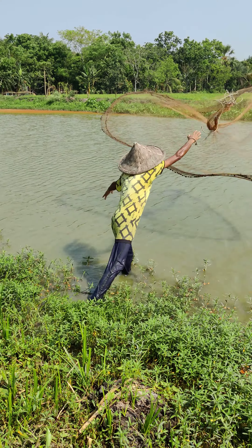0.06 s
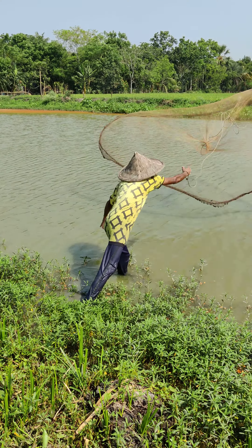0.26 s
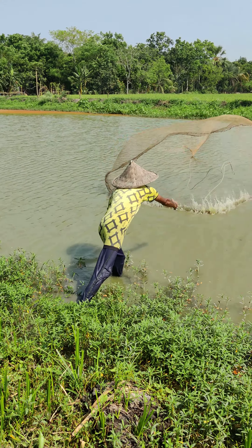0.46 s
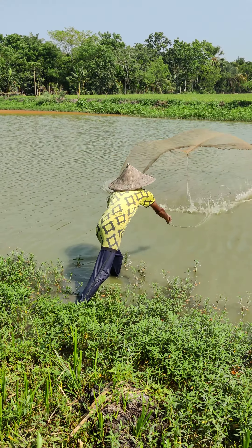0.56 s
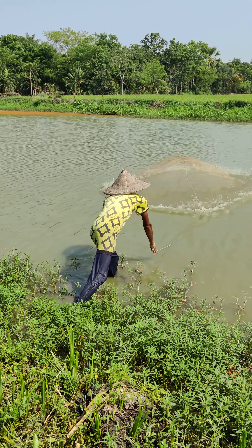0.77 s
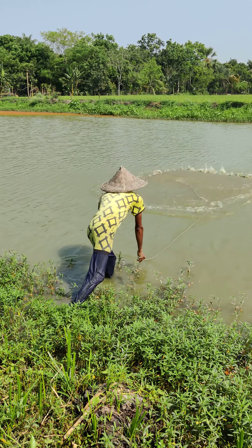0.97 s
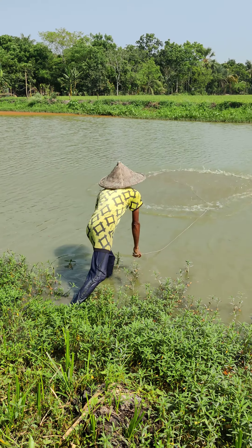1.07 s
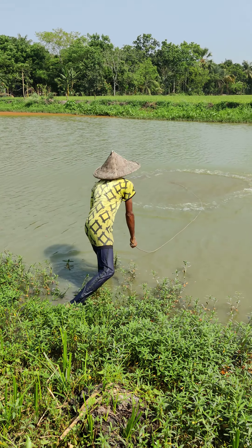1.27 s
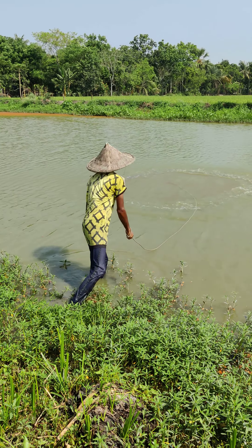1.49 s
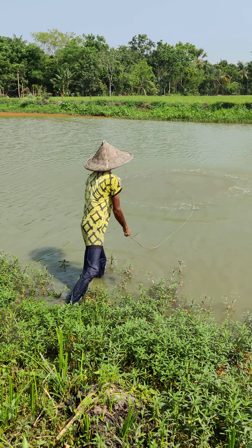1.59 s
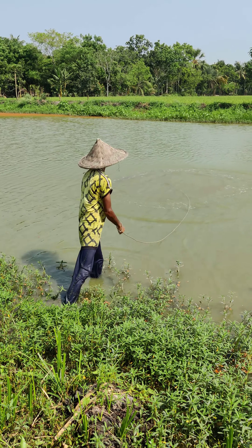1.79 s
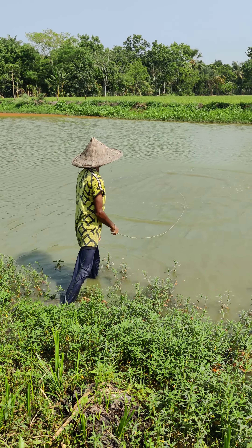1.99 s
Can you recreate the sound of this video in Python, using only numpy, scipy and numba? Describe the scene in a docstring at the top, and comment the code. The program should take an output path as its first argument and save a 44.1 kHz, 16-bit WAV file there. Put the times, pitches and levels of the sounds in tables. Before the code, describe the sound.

A thrown cast net splashes onto a pond: faint high rustle and wet ticks until 0.4 s, then sharp clicks and a bright hissing spray, surging again near 0.77 s with low bubble plops. A tiny bubble whistles upward around 1.1 s, and the splash thins away by 1.7 s. Faint outdoor hiss continues; low wind thumps buffet the phone microphone, much harder on the left, especially after 0.75 s.

```python
"""A faint country hiss and wind at two microphone ports of a phone: noise shaped in spectrum and level.
A wet cast net ticks in flight and on through the splash: clusters of short rings over a fading rustle.
At 0.4 s its weighted rim slaps down on a pond in two sweeps: showers of dying sines make spray and mist.
Trapped bubbles ring lower, and near 1.1 s one whistles upward; the splash thins out by 1.7 s.
Gusts and single eddies buffet the ports throughout, the left far harder."""
import sys
import numpy as np
from scipy import signal
from scipy.fft import rfft, irfft
from scipy.io import wavfile
from scipy.ndimage import uniform_filter1d, map_coordinates
from numba import njit

SR = 44100
rng = np.random.default_rng(int(sys.argv[2]) if len(sys.argv) > 2 else 0)


def unload_wav(signal):
    """Save mono or channel-first audio to the path in sys.argv[1] as 16-bit WAV at rate SR, clipped to [-1, 1]."""
    wavfile.write(
        sys.argv[1],
        SR,
        np.round(np.clip(np.atleast_2d(signal).T, -1, 1) * 32767).astype(np.int16),
    )


def convert_level_to_amplitude(level_db):
    """Map a level in decibels to its linear amplitude factor."""
    exponent = np.asarray(level_db, float) / 20
    return 10 ** exponent


N = 90404
T = np.arange(N) / SR


def curve(table, col):
    """Column of a table joined linearly in time."""
    a = np.array(table, float)
    return np.interp(T, a[:, 0], a[:, col])


def colour(x, points):
    """Causal minimum-phase filter through (freq_hz, gain_db) points."""
    a, size = np.array(points, float), 8192
    log_hz = np.log(np.fft.rfftfreq(size, 1 / SR) + 1)
    gain_db = np.interp(log_hz, np.log(a[:, 0]), a[:, 1])
    # fold the cepstrum to its causal half
    cepstrum = irfft(np.log(convert_level_to_amplitude(gain_db)))
    cepstrum[1:size // 2] *= 2
    cepstrum[size // 2 + 1:] = 0
    impulse = irfft(np.exp(rfft(cepstrum)))[:size // 2]
    return signal.fftconvolve(x, impulse)[:N]


def unit(x):
    """Scaled to rms 1."""
    return x / np.sqrt(np.mean(x ** 2))


def walk(rate_hz):
    """Random levels of rms 1, held 1 / rate_hz and slewed twice."""
    hold = int(SR / rate_hz)
    steps = np.repeat(rng.standard_normal(N // hold + 1), hold)
    slewed = uniform_filter1d(uniform_filter1d(steps, hold), hold)
    return unit(slewed[:N])


def samples(start_s):
    """Times as sample indices."""
    return (start_s * SR).astype(np.int64)


@njit
def ring(start, hz, cycles, size, rise, n):
    """Each grain is a dying sine whose pitch climbs by rise (a fraction) per life of so many cycles."""
    out = np.zeros(n)
    for k in range(len(start)):
        life = cycles[k] * SR / hz[k]
        phase = 0.
        for j in range(min(int(4 * life), n - start[k])):
            phase += min(hz[k] * (1 + rise * j / life), .47 * SR) / SR
            envelope = min(6 * j / life, 1.) * np.exp(-j / life * 1.5)
            out[start[k] + j] += size[k] * envelope * np.sin(2 * np.pi * phase)
    return out


def grains(per_s, lo_hz, hi_hz, cycles, spread_db, rise):
    """A random shower of rings, white on average, of very unequal size."""
    u = rng.random((int(per_s * N / SR), 4)).T
    start = (u[0] * (N - 1)).astype(np.int64)
    hz = np.minimum(lo_hz + (hi_hz - lo_hz) * u[1], .45 * SR)
    size = convert_level_to_amplitude(-spread_db * np.log(1 - u[2])) * np.sqrt(hz)
    return ring(start, hz, cycles * (.5 + u[3]), size, 1. * rise, N)


def spread(make, apart):
    """Mixes a sound common to both ports with ones of their own; apart is the power share of the latter."""
    apart = np.clip(apart, 0, 1)
    return np.sqrt(1 - apart) * make() + np.sqrt(apart) * np.array([make(), make()])


# country hiss: freq_hz, gain_db
AIR_COLOUR = [(100, 12.5), (250, 7), (500, 4.5), (1000, 1), (2500, 1.5), (5000, -2.5), (9000, -3.5),
              (13000, -2), (14200, -13), (16000, -29)]


def air():
    """Steady coloured noise, partly shared by the ports."""
    return spread(lambda: unit(colour(rng.standard_normal(N), AIR_COLOUR)), apart=0.47) * convert_level_to_amplitude(-56.5)


def eddies(table):
    """Each eddy is a push or suck with rebounds, leaning a little early or late."""
    out = np.zeros(N)
    u = rng.random((len(table), 2))
    leans_rad = np.pi * np.round(u[:, 0]) + 0.93 * (u[:, 1] - .5)
    for (start_s, level_db, hz), lean in zip(table, leans_rad):
        x = np.pi * hz * (T - start_s)
        shape = np.cos(lean) * (1 - 2 * x ** 2) + 2 * np.sin(lean) * x
        out += convert_level_to_amplitude(level_db) * shape * np.exp(-np.abs(x) ** 1.587)
    return out


def turbulence(points, depth_db):
    """Coloured noise of rms 1 whose level wanders."""
    return unit(colour(rng.standard_normal(N), points) * convert_level_to_amplitude(depth_db * walk(25.99)))


# slow and quick turbulence: freq_hz, gain_db
RUMBLE_COLOUR = [(12, -13), (25, 10), (45, 1), (75, -7.5), (110, -10.5), (160, -25.5), (250, -62)]
FLUTTER_COLOUR = [(70, -10.5), (130, 5.5), (200, -5), (300, -19.5), (480, -29.5), (700, -58.5)]
# gusts at the left port: time_s, rumble_db, flutter_db
GUST_LEFT = [(0.0, -27, -32.5), (0.1, -33, -82), (0.14, -59, -76), (0.37, -26, -67), (0.44, -30, -33.5),
             (0.48, -28, -73), (0.52, -32, -54), (0.66, -43, -76), (0.78, -15, -33.5), (0.86, -35, -51),
             (0.92, -23, -46.5), (1.08, -31, -30.5), (1.28, -30.5, -55), (1.31, -21.5, -34.5),
             (1.39, -39, -61), (1.45, -28, -40.5), (1.53, -26, -26.5), (1.65, -33, -32), (1.68, -24.5, -65),
             (1.8, -31, -25), (1.96, -28.5, -58), (2.05, -31.5, -69)]
# gusts at the right port: time_s, rumble_db
GUST_RIGHT = [(0.0, -35.5), (0.15, -44.9), (0.29, -39.4), (0.44, -41.7), (0.59, -43.8), (0.73, -38.9),
              (0.88, -49.2), (1.02, -51.2), (1.17, -43.3), (1.32, -47.7), (1.46, -45.0), (1.61, -38.6),
              (1.76, -41.8), (1.9, -50.0), (2.05, -55.3)]
# single eddies hitting each port: centre_s, level_db, pitch_hz
EDDIES_LEFT = [(0.02, -28, 60.6), (0.432, -7.5, 50), (0.535, -25, 88), (0.768, -18.5, 117),
               (0.787, -9.5, 70.4), (0.949, -12, 44), (1.006, -21, 95), (1.047, -21.5, 182),
               (1.048, -13.5, 71.6), (1.067, -17, 177), (1.074, -15, 118), (1.085, -21.5, 183),
               (1.161, -17.5, 103), (1.215, -19.5, 79), (1.241, -15.5, 62), (1.299, -19.5, 51.6),
               (1.457, -10.5, 69.5), (1.48, -13.5, 42.3), (1.509, -14, 80.4), (1.548, -14, 186),
               (1.55, -8, 124), (1.575, -15.5, 62.4), (1.596, -14.5, 46.7), (1.614, -15, 105),
               (1.62, -16, 163), (1.632, -10.5, 65.8), (1.637, -17, 165), (1.66, -15, 73.5),
               (1.706, -15.5, 86.5), (1.76, -17.5, 40), (1.774, -12, 54.7), (1.792, -8.5, 66.4),
               (1.793, -36, 194), (1.819, -27, 214), (1.834, -11, 37), (1.9, -18.5, 83.5)]
EDDIES_RIGHT = [(0.058, -26.3, 43), (0.124, -31.8, 36), (0.223, -25.8, 41), (0.591, -28.1, 41),
                (0.674, -28.7, 34), (1.565, -25.5, 45), (1.712, -27.0, 38)]


def wind():
    """Turbulence and eddies press on each port, unrelated between them."""
    rumble_left = turbulence(RUMBLE_COLOUR, 0.84) * convert_level_to_amplitude(curve(GUST_LEFT, 1))
    flutter_left = turbulence(FLUTTER_COLOUR, 5.2) * convert_level_to_amplitude(curve(GUST_LEFT, 2))
    rumble_right = turbulence(RUMBLE_COLOUR, 0.71) * convert_level_to_amplitude(curve(GUST_RIGHT, 1))
    left = rumble_left + flutter_left + eddies(EDDIES_LEFT)
    right = rumble_right + eddies(EDDIES_RIGHT)
    return np.array([left, right])


def rustle():
    """The flying net: a shower of tiny high rings, fading steadily."""
    level_db, fade_db_per_s = -52, 37
    shower = grains(per_s=3000, lo_hz=5050, hi_hz=12900, cycles=2.1, spread_db=3.57, rise=0.)
    return unit(shower) * convert_level_to_amplitude(level_db - fade_db_per_s * T)


# ticks of the wet net and its weights, and one late water drip (1.412 s): start_s, level_db, pitch_hz
TICKS = [(0.0125, -32.5, 5600), (0.0527, -39, 5600), (0.062, -44, 5400), (0.1427, -46, 5100),
         (0.1526, -35.5, 6200), (0.195, -48, 4300), (0.246, -39, 5490), (0.2717, -33, 5500),
         (0.2728, -30, 11400), (0.291, -39, 5540), (0.3357, -37, 5400), (0.3576, -36, 5940),
         (0.407, -24.5, 3470), (0.4361, -16, 5100), (0.4747, -16.5, 5370), (0.4776, -29, 1840),
         (0.5012, -20, 2250), (0.5078, -28, 2110), (0.6847, -27, 3650), (0.743, -29, 4330),
         (0.752, -27, 3010), (0.7621, -16, 4400), (1.044, -36, 4770), (1.1192, -24, 4500),
         (1.1973, -45, 3900), (1.412, -39, 4500), (1.731, -37.5, 4760)]


def ticks():
    """Each tick is a cluster of three short rings at nearby pitches."""
    start_s, level_db, pitch_hz = np.repeat(np.array(TICKS), 3, axis=0).T
    u = rng.random((len(start_s), 2)).T
    start = samples(start_s + 0.00081 * u[0])
    ratio = np.tile([.8, 1, 1.22], len(TICKS)) + 0.083 * u[1]
    cycles = np.full(len(start), 3.5)
    return ring(start, pitch_hz * ratio, cycles, convert_level_to_amplitude(level_db) / 2, 0., N)


# single big bubbles: start_s, level_db, pitch_hz, life_cycles
PLOPS = [(.502, -49, 690, 9.3), (.522, -41.5, 213.3, 11), (.522, -34.5, 744, 4.8), (.538, -32.5, 613, 9.1),
         (.556, -32.5, 820, 14), (.607, -31.5, 670, 5.4), (.675, -36.5, 716, 8.8), (0.681, -43, 298, 6.1),
         (.755, -40, 700, 7.5), (.785, -26, 840, 4.3), (0.802, -43.5, 338, 13.4), (.806, -41, 564, 11),
         (0.823, -37.5, 814, 9.7), (.87, -44.5, 343, 4.9), (.878, -39.5, 600, 9.6),
         (1.207, -43.5, 1300, 18), (1.262, -44.5, 757, 11.3), (1.315, -48, 620, 8), (1.383, -50, 987, 11),
         (1.448, -46, 836, 13), (1.449, -44, 484, 7.4)]


def plops():
    """Big bubbles ring singly, their pitch climbing slightly."""
    start_s, level_db, pitch_hz, cycles = np.array(PLOPS).T
    return ring(samples(start_s), pitch_hz, cycles, convert_level_to_amplitude(level_db), 0.059, N)


# rising bubble: start_s, level_db, start_pitch_hz, life_cycles, climb_per_life
WHISTLE = [(1.121, -42, 1000, 32, 0.98)]


def whistle():
    """A bubble whistles upward as it nears the surface."""
    start_s, level_db, pitch_hz, cycles, climb = np.array(WHISTLE).T
    return ring(samples(start_s), pitch_hz, cycles, convert_level_to_amplitude(level_db), climb[0], N)


# small bubbles: freq_hz, gain_db
BUBBLE_COLOUR = [(200, -12.5), (350, -10.5), (500, -7.5), (700, 0.5), (900, -2), (1300, -2), (2000, -9)]


def bubbles():
    """A shower of low rings from small trapped bubbles, rms 1."""
    def shower():
        rings = grains(per_s=2400, lo_hz=176, hi_hz=2508, cycles=5.36, spread_db=2.42, rise=.12)
        return unit(colour(rings, BUBBLE_COLOUR))
    return spread(shower, apart=0.15)


# extra treble of the spray: freq_hz, gain_db
MIST_COLOUR = [(2500, -8.5), (4000, 7), (6000, 4.5), (9000, 5), (12000, 1), (15500, 5.5)]
# its level: time_s, level_db
MIST = [(0.41, -39), (0.432, -34), (0.742, -42.5), (0.76, -32), (0.81, -40), (0.85, -53), (1.022, -49),
        (1.05, -43), (1.064, -50.5), (1.5, -65)]


def mist():
    """Fine drops: a bright shower that fades on after its last level."""
    def shower():
        rings = grains(per_s=7000, lo_hz=2470, hi_hz=14600, cycles=2.9, spread_db=2.66, rise=0.12)
        return unit(colour(rings, MIST_COLOUR))
    drops = spread(shower, apart=0.51)
    fade_db = 40 * np.maximum(T - MIST[-1][0], 0)  # 40 dB per s
    return drops * convert_level_to_amplitude(curve(MIST, 1) - fade_db + walk(61.6))


# spray: freq_hz, gain_db
SPRAY_COLOUR = [(900, -7), (1500, 0.5), (2500, 2.5), (4000, 1), (6000, -7), (9000, -16.5), (15000, -11)]


def spray():
    """A dense broadband shower of drops, rms 1."""
    def shower():
        rings = grains(per_s=15000, lo_hz=757, hi_hz=15860, cycles=2.17, spread_db=2.03, rise=0.086)
        return unit(colour(rings, SPRAY_COLOUR))
    return spread(shower, apart=0.2)


# the rim sweeping into the water: time_s, spray_db, bubbles_db
SPLASH = [(0.41, -44, -53), (0.43, -38, -58), (0.456, -40.5, -60), (0.494, -38.5, -47), (0.503, -38, -41),
          (0.56, -36, -38.5), (0.648, -38, -46.5), (0.682, -40.5, -41.5), (0.732, -43.5, -45.5),
          (0.774, -32.5, -43.5), (0.784, -33.5, -38.5), (0.972, -45.5, -48.5), (1.05, -45, -48.5),
          (1.295, -51.5, -59.5), (1.32, -59, -61), (1.41, -57.5, -70), (1.46, -62.5, -59.5),
          (1.518, -69, -64), (1.62, -68, -84)]


def splash():
    """Spray, mist and bubbles follow the rim as it sweeps into the water."""
    contact_s, rise_s, fall_s = .404, .005, 0.046
    opening = np.clip((T - contact_s) / rise_s, 0, 1)
    closing = np.clip((SPLASH[-1][0] - T) / fall_s + 1, 0, 1)
    spray_part = spray() * convert_level_to_amplitude(curve(SPLASH, 1) + walk(45.78))
    bubble_part = bubbles() * convert_level_to_amplitude(curve(SPLASH, 2))
    return opening * closing * (spray_part + mist() + bubble_part) + plops() + whistle()


# cavity resonance of each port: freq_hz, gain_db
PORT_LEFT = [(300, 4), (1000, 2), (2500, -3.5), (4200, -5), (5400, -0.5), (6500, 6.5), (7400, -9.5),
             (9000, -10), (15000, -11.5)]
PORT_RIGHT = [(300, 3), (1000, 0.5), (2500, -1), (3700, 2), (5000, 6), (5800, 5), (7200, -12.5),
              (10000, -14), (15000, -6)]


def ports(heard):
    """Port cavities colour airborne sound; the right port is farther from the splash, so it lags."""
    right_lag_s = 3e-5
    late = map_coordinates(heard[1], [(T - right_lag_s) * SR], order=5, mode="mirror")
    return np.array([colour(heard[0], PORT_LEFT), colour(late, PORT_RIGHT)])


def scene():
    """Airborne sound passes the port cavities; wind strikes the capsules directly."""
    airborne = air() + rustle() + ticks() + splash()
    return ports(airborne) + wind()


def band_limit(x):
    """A steep low-pass at the top of the band."""
    return signal.sosfilt(signal.butter(12, 15750, fs=SR, output="sos"), x)


def record(dry):
    """The phone stores the finished mix."""
    return band_limit(dry)


dry = scene()
out = record(dry)
unload_wav(out)
```